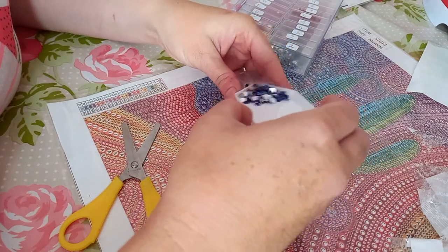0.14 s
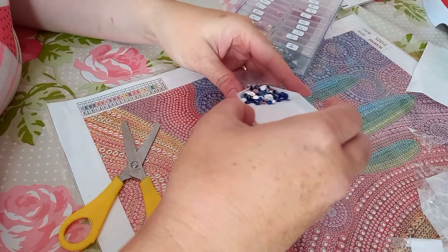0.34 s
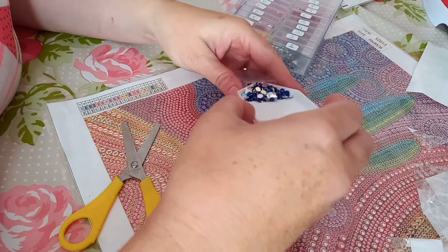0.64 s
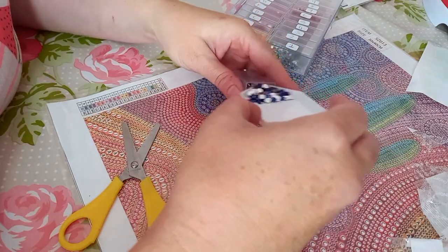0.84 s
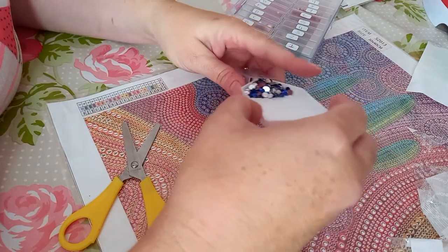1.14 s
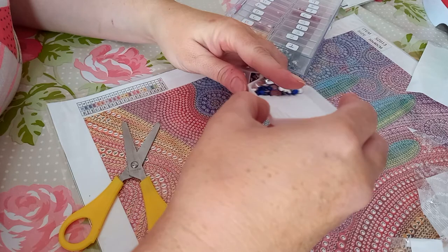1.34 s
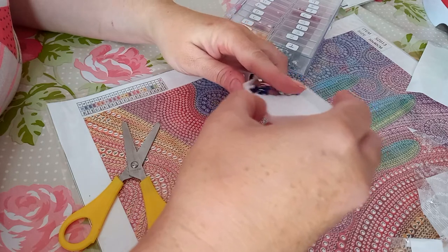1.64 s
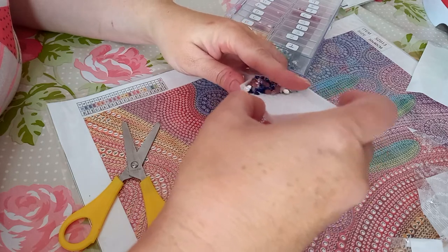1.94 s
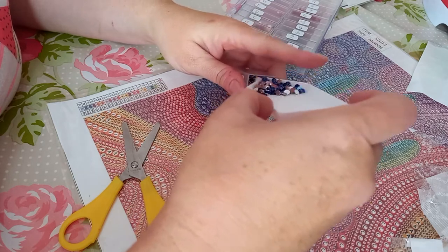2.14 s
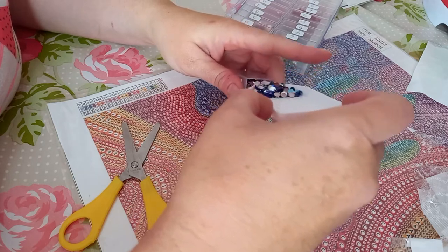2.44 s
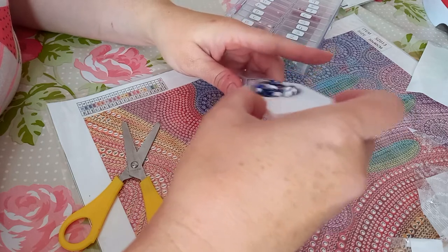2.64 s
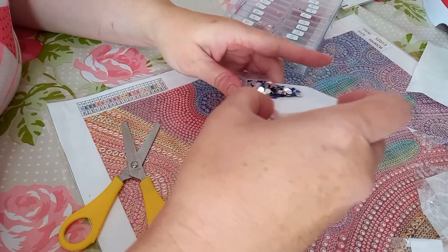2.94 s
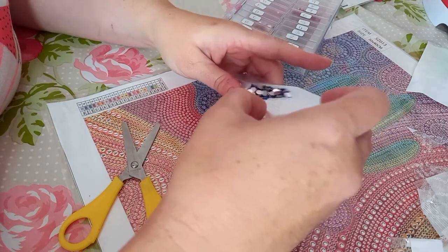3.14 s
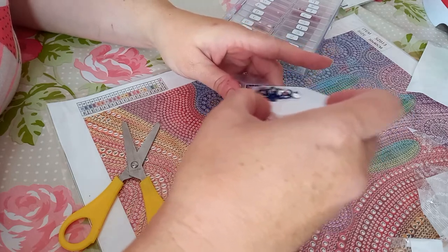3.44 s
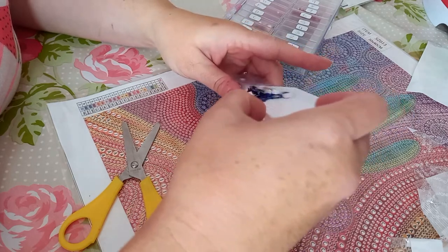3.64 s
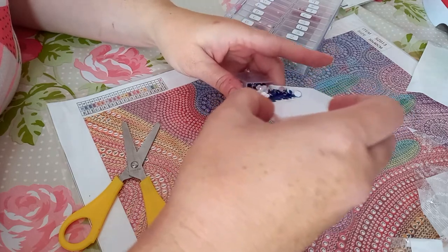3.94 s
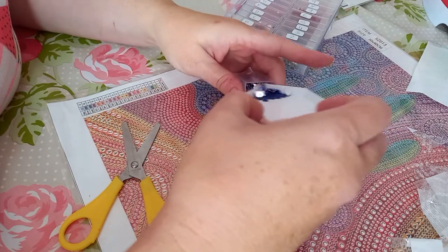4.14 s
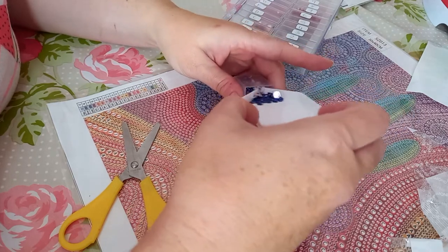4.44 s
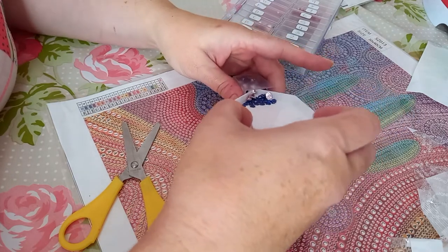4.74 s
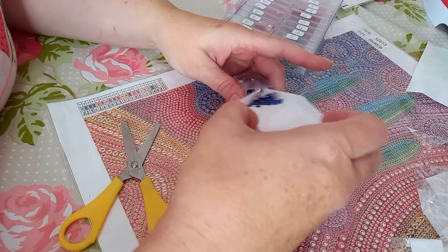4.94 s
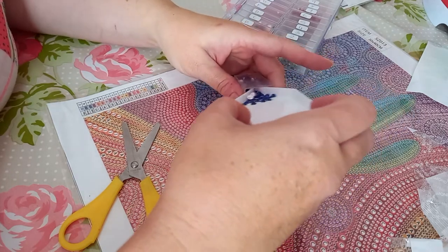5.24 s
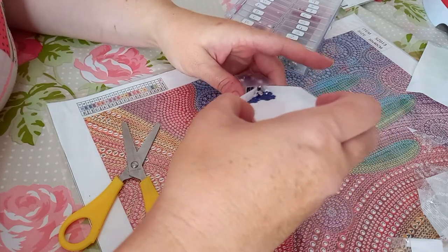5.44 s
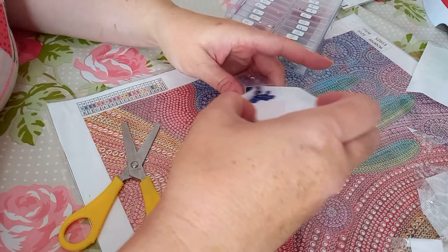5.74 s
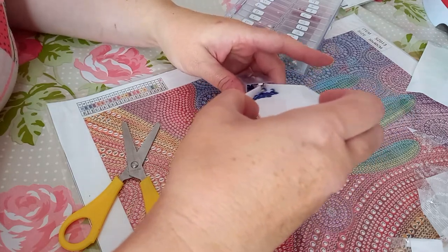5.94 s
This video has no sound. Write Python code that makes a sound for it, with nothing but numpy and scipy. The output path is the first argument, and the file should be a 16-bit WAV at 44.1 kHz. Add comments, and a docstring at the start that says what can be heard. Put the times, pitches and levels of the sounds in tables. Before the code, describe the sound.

A light plastic tray of small beads is jiggled back and forth near a phone microphone. Each shake throws a dense, bright, dry shower of clicks onto the rim, followed by stragglers and duller scuffing. Soft table bumps come near two seconds, then fuller rattling with hollow knocks, a thinner patch before five seconds, a short rough rub and a last stronger clatter. Quiet indoor room, hardly any reverberation.

```python
"""A quiet room: a small plastic tray of craft beads is shaken from side to side, close to a phone.
Bead ticks and scuffs are coloured noise clicks in random showers, densest as the heap lands on the rim.
The thin tray rings as decaying sine modes; rough rubs are tones under slow noise, and
table thumps are soft sine bumps. Shaped noise gives the room's rumble and hiss."""
import sys
import numpy as np
from scipy import signal
from scipy.fft import rfft, irfft, next_fast_len
from scipy.io import wavfile
from scipy.ndimage import uniform_filter1d

SR = 44100
rng = np.random.default_rng(int(sys.argv[2]) if len(sys.argv) > 2 else 0)


def level_to_linear(level):
    """Convert decibel levels to linear amplitude factors, elementwise."""
    exponent = np.asarray(level, float) / 20
    return 10 ** exponent


def master(y):
    """Save y as 16-bit WAV."""
    cut = np.clip(np.atleast_2d(y).T, -1, 1)
    pcm = np.round(cut * 32767)  # scale
    wavfile.write(sys.argv[1], SR, pcm.astype(np.int16))


N = 269010
T = np.arange(N) / SR
KINDS = 14  # different rings per kind of impact
RING_T = np.arange(4096) / SR


def gain_at(table, hz):
    """Gain of a (Hz, dB) table, interpolated over log frequency."""
    table_hz, db = np.transpose(table)
    return level_to_linear(np.interp(np.log(np.maximum(hz, 1)), np.log(table_hz), db))


def unit(x):
    """Scales to rms 1."""
    return x / np.sqrt(np.mean(x ** 2))


def pair(shape, alike):
    """Left and right noise with correlation alike."""
    mid, side = rng.standard_normal((2,) + shape)
    return np.array([np.sqrt(1 + alike) * mid + sign * np.sqrt(1 - alike) * side for sign in (1, -1)])


# Room noise colour. Each row: frequency in Hz, relative level in dB.
ROOM_COLOUR = [(20, -61), (40, -2.5), (70, 6), (120, 1.5), (175, -5), (230, -2.5), (430, -13), (750, -15),
               (1230, -22), (1650, -20), (4000, -28.5), (8400, -17.5), (16000, -33)]


def room():
    """Quiet rumble and hiss: shaped noise, mostly unlike in the two ports."""
    colour = gain_at(ROOM_COLOUR, np.fft.rfftfreq(N, 1 / SR))
    noise = irfft(rfft(pair((N,), alike=0.11)) * colour, N)
    port_db = np.array([[-68.7], [-72.3]])
    return unit(noise) * level_to_linear(port_db)


def fade(t, t60):
    """Exponential decay: 60 dB in t60 s."""
    return np.exp(-np.log(1000) * t / t60)


def curve(table):
    """Columns of a time table, interpolated at every sample."""
    s, *columns = np.transpose(table)
    return [np.interp(T, s, column) for column in columns]


def favour(hz, tones_hz, bump_db, octaves):
    """Gain of each kind of blow: a Gaussian lift around its own tone."""
    distance = np.log2(np.maximum(hz, 1) / tones_hz[:, None]) / octaves
    return level_to_linear(bump_db * np.exp(-.5 * distance ** 2))


def causal(gain):
    """Minimum-phase response of a gain over frequency: nothing sounds before the blow."""
    cepstrum = irfft(np.log(gain + 1e-6))
    half = cepstrum.shape[-1] // 2
    cepstrum[..., 1:half] *= 2
    cepstrum[..., half + 1:] = 0
    return np.exp(rfft(cepstrum))


def peak_one(rings):
    """Scales each kind so that its two port peaks have rms 1."""
    peaks = np.abs(rings).max(axis=-1, keepdims=True)
    return rings / np.sqrt(np.mean(peaks ** 2, axis=0))


def strike(times, sizes, kinds, rings):
    """Each blow sounds one of several rings (channel, kind, sample), by convolution."""
    blows = np.zeros((KINDS, N))
    at = np.clip((times * SR).astype(int), 0, N - 1)
    np.add.at(blows, (kinds, at), sizes)
    size = next_fast_len(N + rings.shape[-1])
    spectra = rfft(blows, size) * rfft(rings, size)
    return irfft(spectra.sum(axis=1), size)[:, :N]


def play_any(table, rings):
    """Listed blows, each on a ring picked by chance."""
    s, db = np.transpose(table)
    return strike(s, level_to_linear(db), rng.integers(KINDS, size=len(s)), rings)


def shower(per_s, spread_db):
    """Random impacts at exponential intervals; most are faint, a few are hard."""
    chance = rng.random((40000, 4))
    times = np.cumsum(-np.log(1 - chance[:, 0])) / per_s
    signs = np.sign(chance[:, 2] - .5)
    sizes = level_to_linear(-spread_db * np.log(1 - .98 * chance[:, 1])) * signs
    kinds = (chance[:, 3] * KINDS).astype(int)
    keep = times < N / SR
    return times[keep], sizes[keep], kinds[keep]


def rattle(rings, force, per_s, spread_db, busy_db):
    """A shower of impacts whose force follows the shaking; below busy_db fewer beads move."""
    times, sizes, kinds = shower(per_s, spread_db)
    power = np.mean(sizes ** 2) * per_s / SR * np.mean(np.sum(rings ** 2, axis=-1))
    now = np.interp(times, T, force)
    share = np.clip(now / level_to_linear(busy_db), .12, 1)  # share of the impacts that happen
    moving = rng.random(len(times)) < share
    level = now / np.sqrt(power * share)  # fewer impacts hit harder, so the mean power follows force
    return strike(times, moving * sizes * level, kinds, rings)


# The heap lands on the rim, thrown or sliding.
# Each row: time in seconds, bead rattle in dB, tray ring in dB, swell in seconds, spill in seconds.
LANDINGS = [(0.055, -46.5, -67, 0.086, 0.0079), (0.148, -73, -82, .008, .012),
            (0.186, -45.5, -75, 0.0075, 0.021), (0.342, -43, -62.5, 0.019, 0.026),
            (0.436, -52.5, -68.5, 0.0065, .044), (0.5076, -46.5, -65, 0.007, 0.054),
            (0.6565, -64, -69.5, 0.025, 0.0035), (0.812, -45.5, -64.5, 0.014, 0.024),
            (0.9708, -41, -72, 0.012, 0.016), (1.132, -47, -61, 0.015, 0.03),
            (1.304, -50, -87, 0.0059, .005), (1.464, -48, -72.5, .035, 0.02),
            (1.622, -54, -67, 0.035, 0.014), (1.785, -52.5, -66.5, 0.0064, .015),
            (1.944, -46.5, -56.5, 0.039, .034), (2.0857, -49.5, -64, 0.014, 0.0054),
            (2.2322, -41, -65, 0.018, 0.013), (2.3034, -49, -53.5, 0.021, 0.11),
            (2.394, -41, -58, 0.0089, 0.0092), (2.535, -44.5, -65, .022, 0.03),
            (2.7014, -42.5, -58, 0.026, 0.065), (2.872, -50, -53.5, 0.037, 0.06),
            (3.0381, -56, -67, 0.014, 0.046), (3.098, -58.5, -61, .017, 0.09),
            (3.1834, -52, -63, .008, 0.019), (3.342, -49, -58, .019, 0.022),
            (3.409, -49.5, -64.5, 0.019, 0.016), (3.5167, -45, -60, 0.016, 0.058),
            (3.6775, -45.5, -60, 0.018, 0.084), (3.8566, -44, -56, 0.022, 0.03),
            (3.943, -43.5, -70, 0.017, 0.012), (4.0463, -44, -56.5, 0.021, 0.029),
            (4.123, -48.5, -65, 0.014, 0.019), (4.214, -38.5, -54.5, 0.018, 0.026),
            (4.2956, -51.5, -62.5, 0.0064, 0.034), (4.3903, -48, -58, 0.021, 0.035),
            (4.5686, -53.5, -66.5, 0.038, .012), (4.746, -56, -63, 0.041, 0.011),
            (4.892, -60, -72, .022, 0.011), (4.994, -52, -64, 0.015, 0.031),
            (5.082, -49.5, -61, 0.011, 0.015), (5.1395, -51.5, -62, 0.016, 0.036),
            (5.2413, -46, -63.5, 0.013, 0.02), (5.3069, -55, -83, 0.011, 0.027),
            (5.405, -46, -63, .012, 0.012), (5.553, -63, -60.5, 0.0089, 0.024),
            (5.6447, -55.5, -59.5, 0.032, 0.048), (5.738, -50, -55, 0.02, 0.086),
            (5.894, -43.5, -54, 0.03, 0.018), (5.96, -56, -65, .011, 0.034),
            (6.0525, -48, -57, 0.016, 0.0092)]


def spill(column):
    """Flow of beads around each landing: it swells steeply, then stragglers follow."""
    flow = np.zeros(N)
    for row in LANDINGS:
        start_s, swell_s, spill_s = row[0], row[3], row[4]
        a, b = np.clip([int((start_s - .2) * SR), int((start_s + .3) * SR)], 0, N)
        t = T[a:b] - start_s
        flow[a:b] += level_to_linear(row[column]) * np.exp(np.where(t < 0, -(t / swell_s) ** 2, -t / spill_s))
    return flow


def hush():
    """Gain of the rolling: it dips just before each landing, while the beads are in flight."""
    depth_db, lead_s, width_s = -3.5, .04, .016
    t = T[::64]
    dips = sum(np.exp(-((t - row[0] + lead_s) / width_s) ** 2) for row in LANDINGS)
    return np.interp(T, t, level_to_linear(depth_db * dips))


def bead_rings(spectrum, tones_hz, bump_db, t60, echo_db, echo_t60, alike):
    """A bead's click: a short crack of coloured noise, then echoes off hands and table."""
    hz = np.fft.rfftfreq(len(RING_T), 1 / SR)
    onset = 1 - fade(RING_T, .001)
    shape = onset * (fade(RING_T, t60) + level_to_linear(echo_db) * fade(RING_T, echo_t60))
    colour = gain_at(spectrum, hz) * favour(hz, tones_hz, bump_db, octaves=0.34)
    spectra = rfft(pair((KINDS, len(RING_T)), alike) * shape) * causal(colour)
    # the right port is a little further off, by an amount that depends on the bead's place
    lag_s = 4.5e-5 + 2e-5 * rng.standard_normal((KINDS, 1))
    spectra[1] *= np.exp(-2j * np.pi * hz * lag_s)
    return peak_one(irfft(spectra))


# How hard the beads roll between landings.
# Each row: time in seconds, bead rattle in dB, tray ring in dB, scuff against rattle in dB.
ROLLING = [(0, -53, -64.5, -7), (0.3, -55, -66, -6.5), (0.41, -70, -77.5, -9.5), (0.5, -61, -66.5, -7.5),
           (0.6, -75, -75.5, -6), (0.715, -101, -89, -23), (0.78, -56.5, -65.5, -10),
           (1.22, -60.5, -62, -5), (1.37, -67, -79, -19.5), (1.55, -66.5, -65, -5.5), (1.71, -79, -103, -8),
           (1.79, -58.5, -74, -11.5), (2.05, -58.5, -56, -5.5), (2.27, -58.5, -63.5, -5.5),
           (2.47, -66.5, -62.5, -8), (2.63, -48, -52.5, -3.5), (2.82, -55.5, -62, -1.5),
           (2.96, -64, -60.5, -3), (3.17, -52, -56, -3.5), (3.29, -63.5, -80.5, -5),
           (3.45, -53.5, -66, -4.5), (3.63, -63.5, -70, -3), (3.78, -68, -72, -3), (3.92, -54, -64.5, -0.5),
           (4.3, -62.5, -70, -8), (4.65, -69.5, -83.5, -6.5), (4.76, -72, -70.5, -4), (4.84, -96, -96, -10),
           (5.05, -73.5, -78.5, -5.5), (5.35, -59, -64.5, -5), (5.54, -55, -60, 8), (5.65, -70, -70, -2),
           (5.94, -63, -73.5, -0.5), (6.01, -71.5, -70.5, -2.5), (6.1, -52, -67, -2.5)]
# Single beads that stand out. Each row: time in seconds, level in dB.
LOUD_TICKS = [(0.0442, -37), (0.0986, -47), (0.1245, -54), (0.1385, -22.5), (0.143, -21.5), (0.2203, -45),
              (0.2393, -27.5), (0.2667, -30.5), (0.3281, -43), (0.3485, -27), (0.3749, -29.5),
              (0.4268, -36), (0.4593, -34.5), (0.5076, -30.5), (0.5471, -35), (0.568, -29.5),
              (0.6019, -27.5), (0.6523, -34), (0.7281, -38.5), (0.7531, -36.5), (0.808, -31.5),
              (0.9017, -30), (0.9636, -28), (1.0664, -39.5), (1.1332, -24), (1.2754, -37.5), (1.3667, -51),
              (1.4655, -33), (1.4849, -32.5), (1.6256, -29), (1.7803, -37), (1.8715, -35.5), (1.9154, -34),
              (1.9419, -24), (2.0307, -38.5), (2.0846, -27.5), (2.2277, -21), (2.126, -42), (2.2981, -31.5),
              (2.3944, -24.5), (2.4837, -50), (2.6293, -44), (2.7012, -23), (2.7101, -22), (2.7426, -29),
              (2.7735, -21), (2.8344, -27.5), (2.8852, -27.5), (2.9152, -29.5), (3.0314, -29),
              (3.1142, -32), (3.1846, -26.5), (3.2759, -34.5), (3.3392, -28), (3.3901, -29), (3.5103, -27),
              (3.5173, -23), (3.5871, -27), (3.6759, -30.5), (3.7478, -28.5), (3.7887, -30.5),
              (3.854, -26.5), (3.8625, -21.5), (3.89, -25.5), (3.9034, -28), (3.9538, -34), (4.0426, -22),
              (4.0506, -21), (4.0725, -27), (4.2072, -24), (4.2207, -26), (4.3863, -28), (4.4103, -29),
              (4.4213, -27), (4.4856, -39.5), (4.5734, -29), (4.6822, -44), (4.8588, -52), (4.958, -49),
              (4.989, -30.5), (5.0753, -30.5), (5.0847, -34.5), (5.2419, -29), (5.401, -25), (5.4135, -33),
              (5.4429, -32), (5.5143, -29), (5.5791, -34), (5.7881, -31.5), (5.8091, -39), (5.837, -31),
              (5.8824, -27.5), (5.9029, -25.5)]
# Bead click colour. Each row: frequency in Hz, relative density in dB per Hz.
BEAD_COLOUR = [(2000, -46), (2500, -35.5), (3500, -32.5), (4800, -3), (6900, -7.5), (7900, 0.5),
               (9200, 1.5), (10200, -2.5), (13500, -1.5), (15800, -5), (17000, -35)]
# Scuff colour. Each row: frequency in Hz, relative density in dB per Hz.
SCUFF_COLOUR = [(1900, -19), (2300, 2), (2750, -8), (3100, 0.5), (3600, -4.5), (4800, 0.5), (6000, -5),
                (7200, -5)]


def beads():
    """Bead against bead ticks brightly; beads scuffing over the ridged floor sound duller."""
    bright_hz, dull_hz = np.geomspace(7000, 13000, KINDS), np.geomspace(2400, 6000, KINDS)
    bright = bead_rings(BEAD_COLOUR, bright_hz, bump_db=10, t60=.006, echo_db=-23, echo_t60=.12, alike=.3)
    dull = bead_rings(SCUFF_COLOUR, dull_hz, bump_db=2, t60=.01, echo_db=-18, echo_t60=.14, alike=.057)
    roll_db, _, scuff_db = curve(ROLLING)
    force = level_to_linear(roll_db) * hush() + spill(column=1)
    ticking = rattle(bright, force, per_s=2800, spread_db=5, busy_db=-42.5)
    scuffing = rattle(dull, force * level_to_linear(scuff_db), per_s=2000, spread_db=5, busy_db=-54)
    return ticking + play_any(LOUD_TICKS, bright + level_to_linear(-18) * dull) + scuffing


def play(table, tones_hz, rings):
    """Listed blows, each on the ring nearest its tone."""
    s, db, hz = np.transpose(table)
    nearest = np.abs(np.log(hz[:, None] / tones_hz)).argmin(axis=1)
    return strike(s, level_to_linear(db), nearest, rings)


def tray_rings(modes, tones_hz, bump_db, detune, spot_db, turn_rad):
    """Modes start together; each striking spot weights and detunes them, the ports differ in phase."""
    hz, db, t60, pan_db = np.transpose(modes)[:, :, None]
    level_spot, tune_spot, phase_spot = rng.standard_normal((3, KINDS, len(modes), 1))
    weight = favour(hz[:, 0], tones_hz, bump_db, octaves=0.078)[:, :, None] * level_to_linear(db + spot_db * level_spot)
    phase = 2 * np.pi * hz * (1 + detune * tune_spot) * RING_T
    sides = [weight * level_to_linear(sign * pan_db / 2) * fade(RING_T, t60)
             * np.sin(phase + sign * turn_rad * phase_spot) for sign in (1, -1)]
    onset = 1 - fade(RING_T, .006)
    return peak_one(np.sum(sides, axis=2) * onset)


# Tray floor modes, before each spot's detuning and weighting.
# Each row: frequency in Hz, relative level in dB, t60 in seconds, left minus right in dB.
FLOOR_MODES = [(1276, -11, 0.13, -6), (1387, -15.5, 0.15, -1), (1502, -8, 0.091, 15.5),
               (1590, -12.5, 0.08, 33.5), (1680, 5, 0.051, 17.5), (1790, 9.5, 0.039, 7.5),
               (1882, -5, 0.086, -16), (2103, -11, 0.17, -22.5), (2960, 10, 0.0075, -12.5)]
# Deep bending modes of the tray, likewise.
# Each row: frequency in Hz, relative level in dB, t60 in seconds, left minus right in dB.
BENDING_MODES = [(565, -0.5, 0.046, 17), (752, 15, 0.041, 0), (851, 15.5, 0.033, -2.5),
                 (1004, 5, 0.035, 20), (1250, 0, 0.025, 25)]
# Knocks on the tray floor. Each row: time in seconds, peak level in dB, tone in Hz.
FLOOR_KNOCKS = [(0.1377, -47.5, 1705), (0.1771, -49.5, 1750), (0.239, -51, 1760), (0.3497, -55, 1644),
                (0.429, -48.5, 1754), (0.5468, -54, 1790), (0.9004, -50, 1760), (0.9523, -42, 1710),
                (0.9738, -47, 1850), (1.0591, -45.5, 1710), (1.118, -43, 1616), (1.1993, -42.5, 1845),
                (1.2232, -46.5, 1760), (1.362, -52.5, 1627), (1.4153, -48, 1630), (1.5151, -53, 1710),
                (1.5919, -49.5, 1510), (1.746, -52.5, 1610), (1.8927, -44.5, 1717), (1.9052, -39, 1590),
                (2.15, -40.5, 1656), (2.197, -40.5, 1730), (2.2185, -37.5, 1532), (2.3058, -40.5, 1810),
                (2.3791, -39, 1620), (2.5128, -40.5, 1680), (2.5233, -41, 1630), (2.5647, -43.5, 1680),
                (2.5851, -38, 1760), (2.6056, -40, 1650), (2.6585, -37, 1626), (2.6774, -35, 1710),
                (2.6854, -39, 1630), (2.7128, -41, 1710), (2.7413, -46, 1670), (2.7532, -37.5, 1715),
                (2.7792, -38, 1680), (2.846, -38, 1660), (3.096, -40.5, 1730), (3.1508, -44, 1705),
                (3.5015, -44, 1660), (3.5779, -42, 1760), (3.6577, -40.5, 1710), (3.8478, -40.5, 1620),
                (4.0298, -45, 1650), (4.198, -42.5, 1703), (4.385, -45, 1540), (4.745, -60, 1700),
                (5.073, -50, 1662), (5.3843, -46.5, 1710), (5.3977, -42, 1618), (5.4636, -46, 1620),
                (5.5135, -48, 1600), (5.5559, -53, 1710), (5.6591, -58, 1630), (5.7205, -41.5, 1647),
                (5.8512, -38, 1680), (5.8796, -35.5, 1707)]
# Deep thuds of the tray. Each row: time in seconds, level in dB.
DEEP_THUDS = [(0.1761, -58.5), (0.3268, -59), (0.4285, -63.5), (0.4914, -61), (0.7977, -57), (1.1224, -61),
              (2.219, -56.5), (2.3841, -59), (2.5228, -59.5), (2.6849, -56.5), (3.1503, -68), (3.1708, -62),
              (3.3349, -64), (3.5005, -65), (3.6711, -60.5), (3.8463, -55), (4.0348, -57), (4.2119, -62),
              (4.3835, -52), (4.5611, -63), (4.9877, -61), (5.0715, -61.5), (5.2341, -56), (5.3942, -55),
              (5.5135, -57), (5.7345, -55), (5.8083, -54.5), (5.8362, -53), (5.8791, -47.5),
              (6.0403, -61.5)]


def tray():
    """Impacts ring the floor modes; listed thuds and a fainter shower bend the tray deeply."""
    tones_hz = np.geomspace(1350, 1900, KINDS)
    floor = tray_rings(FLOOR_MODES, tones_hz, bump_db=13, detune=.012, spot_db=3, turn_rad=.35)
    deep = tray_rings(BENDING_MODES, tones_hz / 2, bump_db=2, detune=.02, spot_db=2.5, turn_rad=.35)
    force = level_to_linear(curve(ROLLING)[1]) * hush() + spill(column=2)
    ringing = rattle(floor, force, per_s=650, spread_db=4, busy_db=-57.5)
    bending = rattle(deep, level_to_linear(-24.5) * force, per_s=550, spread_db=0, busy_db=-78.5)
    thuds = play_any(DEEP_THUDS, deep + level_to_linear(5.5) * floor)
    return ringing + play(FLOOR_KNOCKS, tones_hz, floor) + thuds + bending


# Rough tones, most as of something dragged over plastic; the 240 Hz row is a low rough hum of the table under
# its bumps. Each row: start in seconds, end in seconds, frequency in Hz, level in dB.
ROUGH_TONES = [(5.47, 5.575, 2950, -58), (5.48, 5.56, 5900, -63), (5.5, 5.6, 1480, -63),
               (5.58, 5.71, 1350, -63), (3.11, 3.19, 950, -67), (4.722, 4.744, 3900, -65),
               (3.87, 3.96, 2650, -58), (1.88, 2.02, 240, -71)]


def rubs():
    """Short rough tones, as of skin or beads dragged over plastic, and a low hum of the bumped table: carriers
    under slow noise."""
    out = np.zeros((2, N))
    for start_s, end_s, hz, db in ROUGH_TONES:
        a, b = int(start_s * SR), int(end_s * SR)
        phase = 2 * np.pi * hz * T[a:b]
        rough = uniform_filter1d(pair((2, b - a), alike=.6), int(SR / (60 + .07 * hz)))
        tone = rough[:, 0] * np.sin(phase) + rough[:, 1] * np.cos(phase)
        out[:, a:b] += level_to_linear(db) * np.sqrt(np.hanning(b - a)) * unit(tone)
    return out


# Bumps against the table, each shaking one low mode.
# Each row: time of the height in seconds, frequency in Hz, rms level at the height in dB.
TABLE_BUMPS = [(1.935, 69, -52.5), (1.977, 118, -60.5), (1.996, 67.5, -53)]


def thump():
    """Soft bumps shake the low modes of the table: sines under a Gaussian swell and fall."""
    width_s = 0.029
    return sum(np.sqrt(2) * level_to_linear(db) * np.exp(-((T - s) / width_s) ** 2) * np.sin(2 * np.pi * hz * (T - s))
               for s, hz, db in TABLE_BUMPS)


def scene():
    """Everything at the two microphone ports."""
    return room() + beads() + tray() + rubs() + thump()


def band_limit(x):
    """A steep low-pass at the top of the band."""
    return signal.sosfilt(signal.butter(12, 17070, fs=SR, output="sos"), x)


def record(dry):
    """The phone cuts the top with a steep elliptic low-pass at 15.9 kHz."""
    low_pass = signal.ellip(8, .2, 60, 15900, fs=SR, output="sos")
    mix = signal.sosfilt(low_pass, dry)
    return band_limit(mix)


dry = scene()
out = record(dry)
master(out)
```